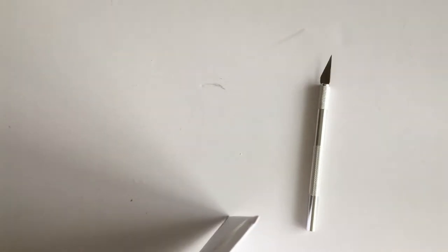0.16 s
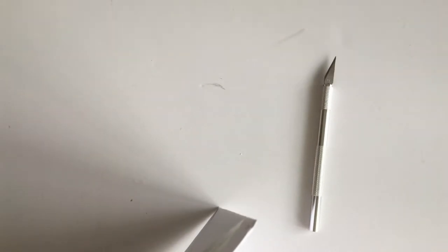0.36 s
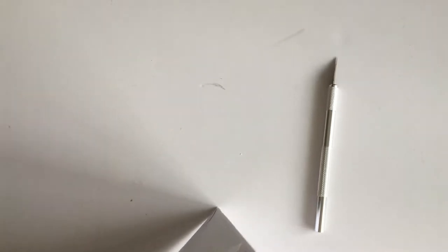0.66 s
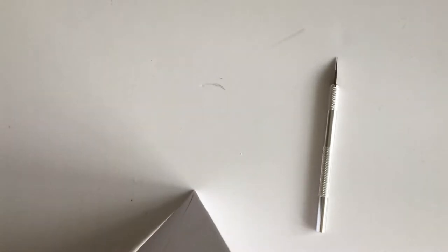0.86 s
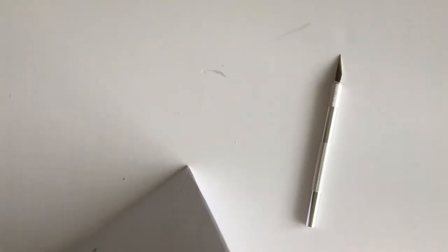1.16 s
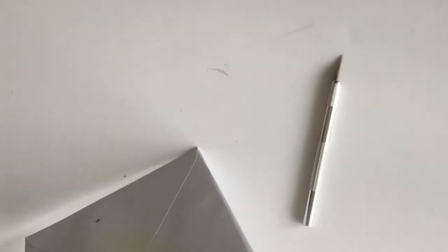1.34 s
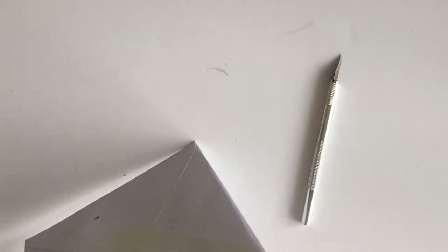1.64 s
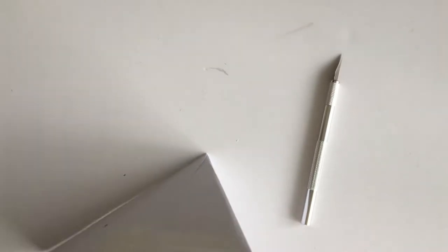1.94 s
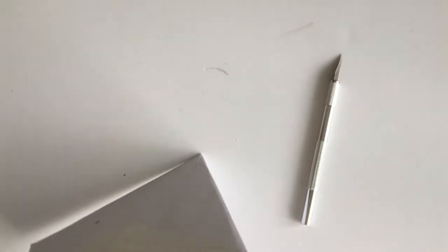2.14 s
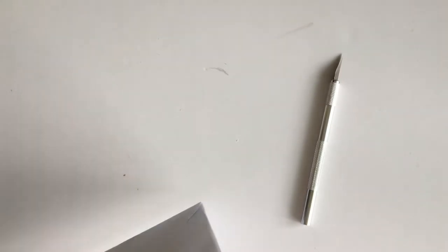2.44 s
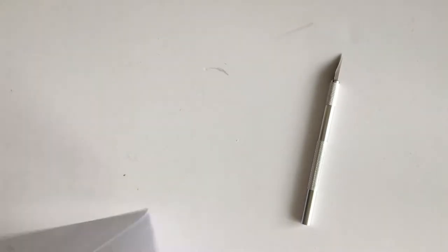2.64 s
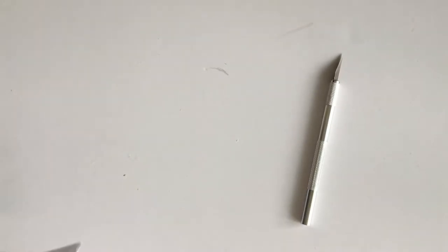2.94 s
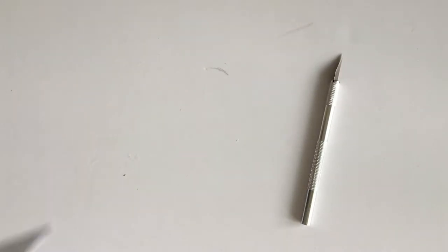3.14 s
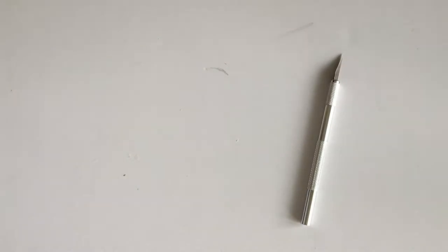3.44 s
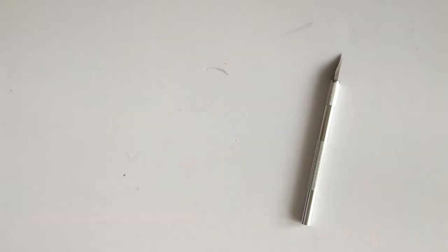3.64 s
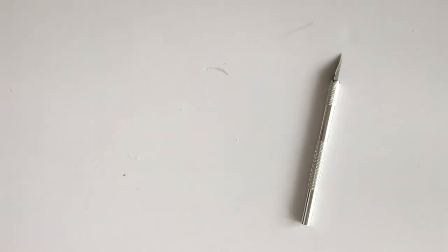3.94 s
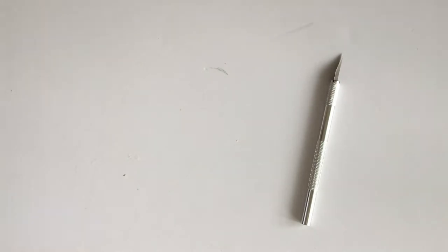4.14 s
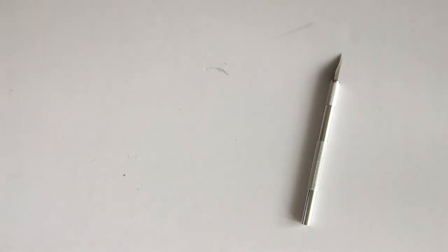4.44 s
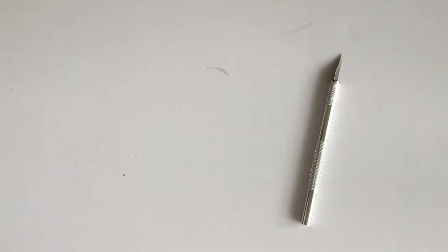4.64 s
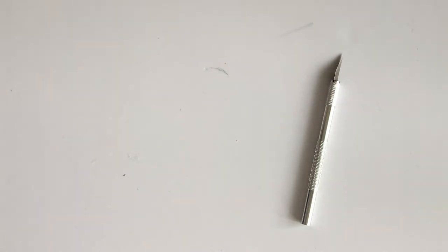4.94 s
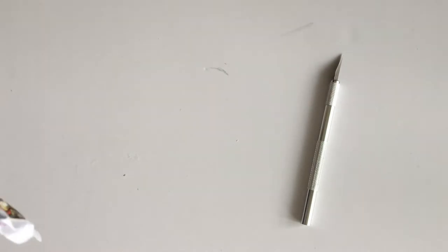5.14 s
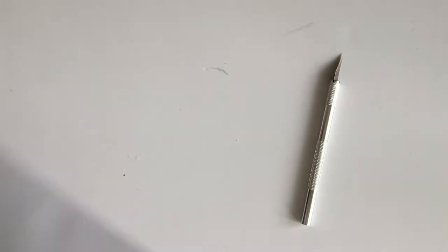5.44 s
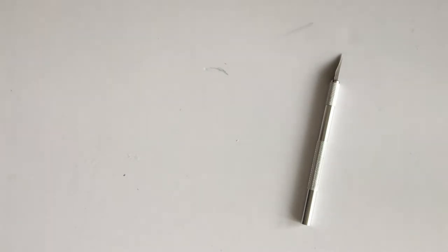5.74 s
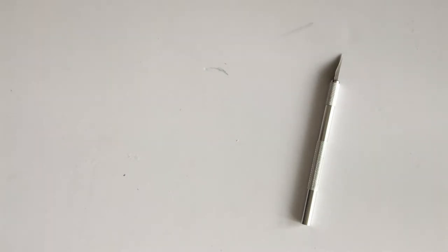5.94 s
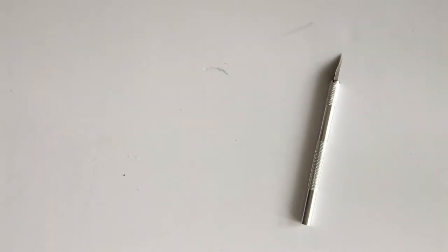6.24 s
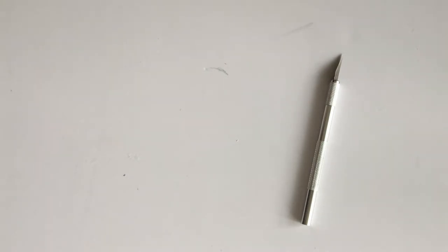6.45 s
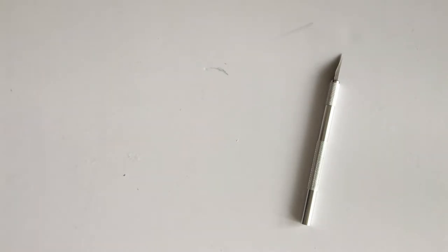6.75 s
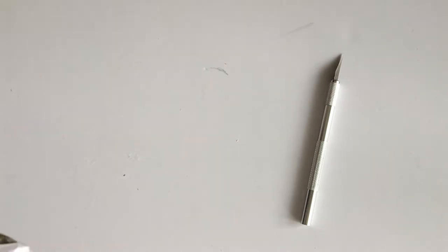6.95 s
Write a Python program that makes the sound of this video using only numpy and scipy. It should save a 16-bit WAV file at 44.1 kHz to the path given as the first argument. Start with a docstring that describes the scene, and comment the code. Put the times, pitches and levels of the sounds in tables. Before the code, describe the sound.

A small, quiet room heard through a close phone microphone, with a very faint floor. The first half second is nearly silent, save a tiny tick or two. From about 0.6 s paper is handled with light dry clicks and soft rubbing; near 0.95 s it bumps the desk, a short woody knock with a low thud and a puff of air. Creases pop until a sharp, loud rip at 1.7-1.85 s, jerky surges of snapping fibres. Brisk rustling and a few clicks lead to a second, quieter, brighter rip at 2.53-2.7 s, with soft low thumps of flexing paper. From 3 to 4.6 s come sparse, faint crinkles and sliding. Around 4.7 s and 5 s creases snap harder, and from 6 to 6.7 s the crackling, scraping and rubbing are densest, easing to small ticks by 7 s. Low fluttering air accompanies the movements.

```python
"""At a desk in a small quiet room, close to a phone's microphone, a paper envelope is handled with dry clicks.
It bumps the desk near 0.95 s, then tears open in two rips, near 1.7 s and 2.5 s: surges of snapping fibres.
Rummaging follows to the end: creases buckle, edges scrape and sheets slide over each other in filtered grains.
Throughout, the swaying paper fans low filtered noise at the microphone, over a faint room floor."""
import sys
import numpy as np
from scipy import signal
from scipy.fft import rfft, irfft
from scipy.io import wavfile
from scipy.ndimage import uniform_filter1d, map_coordinates

SR = 44100
rng = np.random.default_rng(int(sys.argv[2]) if len(sys.argv) > 2 else 0)


def transcribe(signal):
    """Save signal, clipped to [-1, 1], as a 16-bit WAV file at the path in sys.argv[1]."""
    frames = np.atleast_2d(signal).T
    limited = np.clip(frames, -1, 1)
    pcm = np.round(limited * 32767).astype(np.int16)
    wavfile.write(sys.argv[1], SR, pcm)


N = 312669
TIME = np.arange(N) / SR

# Table levels are relative: most layers add a trim of their own. Spectra give shape only.
# spectrum of the quiet room: (frequency [Hz], level per Hz [dB])
ROOM_SPECTRUM = [(25, -21), (48, -14.5), (68, -8), (110, -14), (300, -16.5), (500, -23.5), (1000, -29),
                 (2300, -33.5), (3500, -35.5), (9500, -40), (15500, -53)]
# spectrum of air fanned by the paper: (frequency [Hz], level per Hz [dB])
SWAY_SPECTRUM = [(22, -21.5), (42, -5), (65, 4), (100, -0.5), (130, -5), (220, -11.5), (400, -23),
                 (900, -36), (3000, -49)]
# wafts of air from the swaying envelope: (peak time [s], decay [s], level [dB])
WAFTS = [(0.958, 0.03, -41), (1.09, 0.18, -48.5), (2.44, 0.17, -48.5), (3.21, 0.07, -57),
         (3.6, 0.03, -54.5), (4.425, 0.017, -53), (4.73, 0.025, -44), (5.0, 0.17, -52), (5.224, 0.02, -49),
         (5.35, 0.1, -53.5), (5.79, 0.011, -46), (6.3, 0.018, -54), (6.43, 0.05, -57.5),
         (6.62, 0.02, -48.5), (6.888, 0.043, -45)]
WAFT_RISE_S = 0.027
# bumps on the desk: (time [s], knock level [dB], thud level [dB])
DESK_BUMPS = [(0.9377, -19, -34), (0.946, -31, -16.5), (0.9605, -47, -27)]
# modes of the desk in the knock: (frequency [Hz], level [dB], t60 [s])
KNOCK_MODES = [(340, -13, 0.011), (423, 1.5, 0.015), (650, -18, 0.013), (1320, -22, 0.0087)]
# modes of the desk in the thud: (frequency [Hz], level [dB], t60 [s])
THUD_MODES = [(62, -6, 0.055), (125, -16, 0.084), (187, -17, 0.075)]
# fingers pressing and flexing the envelope: (time [s], level [dB], starting pitch [Hz])
PRESSES = [(0.702, -45.5, 118), (0.777, -47, 111), (2.019, -57, 133), (2.089, -40, 103), (2.51, -60, 90),
           (2.545, -36, 110), (2.684, -31, 125), (4.713, -41.5, 80.6), (5.068, -48.5, 109),
           (5.79, -47, 139.3), (6.431, -60.5, 122), (6.90, -68.5, 75)]
# creases buckling: (time [s], ring level [dB], ring pitch [Hz], treble tick level [dB], low puff level [dB])
CREASES = [(0.408, -57, 3200, -67, -61), (0.739, -77, 3390, -48, -63), (0.842, -47.5, 2240, -43, -56),
           (0.853, -66, 2970, -35, -81), (0.888, -48.5, 1370, -64, -58), (1.0833, -40.5, 2180, -65, -42.5),
           (1.2437, -35.5, 1900, -73, -57), (1.3175, -44, 1450, -53, -61), (1.348, -47.5, 1580, -53, -62),
           (1.424, -56.5, 1280, -71, -65), (1.5161, -60, 2400, -50.5, -54), (1.6074, -54.5, 2220, -45, -63),
           (1.616, -70, 2070, -44.5, -53), (2.0417, -42.5, 1300, -48, -74), (2.2058, -34, 1480, -46, -65),
           (2.4043, -39.5, 1280, -51, -46), (2.451, -42.5, 1370, -63, -46.5), (2.7954, -71, 2440, -44, -74),
           (3.073, -58.5, 650, -55.5, -44), (3.0824, -49, 1450, -45.5, -53), (3.0918, -57, 910, -52, -56.5),
           (3.181, -51, 2020, -55, -49), (3.1878, -42.5, 1860, -50.5, -41), (3.2443, -45.5, 1540, -62, -51),
           (3.2621, -55, 3300, -43, -65), (3.2853, -45.5, 2840, -49, -57), (3.567, -46.5, 1238, -72, -52),
           (3.5855, -43.5, 2280, -40, -50), (3.788, -66.5, 2180, -64.5, -68.5),
           (3.8572, -66, 2200, -67, -67), (3.9427, -60, 2260, -59.5, -64), (3.983, -66, 2100, -61, -64),
           (4.0411, -46, 2960, -50, -49.5), (4.046, -59, 1690, -49, -45), (4.1434, -48.5, 1940, -54, -59.5),
           (4.3355, -53, 583, -65, -44), (4.4489, -46, 1360, -70, -55), (4.602, -49, 1980, -57, -48),
           (4.62, -50, 1310, -66, -54), (4.7096, -43, 1860, -38, -35), (4.714, -33.5, 2000, -44, -47),
           (4.9075, -52, 480, -62, -44.5), (5.0078, -30.5, 1660, -42, -45.5), (5.071, -60, 2510, -52, -56),
           (5.1811, -37, 1400, -71, -56), (5.3534, -34, 1710, -48.5, -41), (5.368, -60, 2300, -39.5, -70),
           (5.3909, -37.5, 1630, -69, -51), (5.4387, -48, 2030, -47.5, -51.5),
           (5.526, -40, 1187, -69.5, -50), (5.5354, -44, 1140, -66, -54.5), (5.807, -45.5, 1080, -66, -52),
           (5.887, -52, 2110, -50.5, -53), (5.9422, -51.5, 2290, -47.5, -71),
           (5.9756, -47, 1320, -57, -49.5), (6.0288, -45.5, 2260, -40.5, -54),
           (6.047, -64, 2200, -61, -47.5), (6.1197, -36, 1950, -38, -52), (6.1736, -37, 1330, -35, -59),
           (6.2394, -29.5, 2050, -43, -41), (6.3855, -39.5, 2350, -63, -60), (6.4, -42.5, 2130, -48, -71),
           (6.4327, -28, 1480, -59, -42.5), (6.5408, -43, 1800, -50, -59), (6.5726, -37, 1650, -34, -46),
           (6.5958, -41, 2750, -34, -47), (6.5998, -38.5, 2090, -45, -54),
           (6.6952, -53.5, 2600, -47, -55.5), (6.878, -43.5, 2380, -48, -69),
           (6.899, -53, 1790, -69, -47.5), (6.9663, -53, 1010, -53.5, -48.5)]
# resonances of the envelope's panels, widened by band() to an octave or more:
# (centre [Hz], nominal width [Hz], level [dB])
PANEL_RESONANCES = [(383, 110, -6), (613, 90, -2), (840, 67, -6.5), (1300, 71, -20.5), (2350, 2700, -13),
                    (4500, 680, -16.5)]
# short brisk scrapes of an edge: (time [s], length [s], level [dB], centre [Hz])
SCRAPES = [(0.002, 0.02, -60, 1850), (0.316, 0.027, -64, 7400), (0.408, 0.016, -62.5, 3400),
           (0.706, 0.04, -53, 7200), (0.771, 0.019, -56, 7050), (1.448, 0.022, -50.5, 5020),
           (1.587, 0.004, -47, 5900), (2.907, 0.039, -58.5, 5240), (3.079, 0.023, -48.5, 6500),
           (3.26, 0.027, -47, 6500), (4.375, 0.021, -51, 2500), (4.394, 0.03, -48, 5950),
           (5.79, 0.012, -54, 2200), (6.006, 0.037, -52, 4570), (6.096, 0.04, -43.5, 2980),
           (6.251, 0.055, -42, 3900), (6.382, 0.045, -48, 3700), (6.552, 0.028, -51, 3000)]
# strokes of paper over paper:
# (start time [s], length [s], hiss level [dB], sheet body level [dB], swell from start to end [dB])
STROKES = [(0.6, 0.1, -75, -76, 5), (0.796, 0.36, -62, -55.5, -3), (1.052, 0.25, -56, -52.5, -12),
           (1.307, 0.14, -59, -57.5, -11), (1.425, 0.1, -56, -58.5, -4), (1.576, 0.037, -60, -58, -1.5),
           (1.65, 0.08, -59.5, -63, 10), (1.863, 0.11, -57, -55, -9), (1.97, 0.11, -52.5, -44, 6),
           (2.128, 0.16, -54.5, -57, -4), (2.322, 0.086, -54, -52.5, 5.5), (2.454, 0.077, -66, -59, 1),
           (2.716, 0.13, -60.5, -67, 2), (2.902, 0.051, -61, -60, -1), (3.013, 0.069, -66.5, -62, 8.5),
           (3.172, 0.14, -60.5, -58.5, 0), (3.376, 0.12, -62.5, -63.5, -3), (3.687, 0.097, -70, -66.5, -8),
           (4.03, 0.23, -58.5, -62, 1.5), (4.311, 0.22, -53.5, -53, 1), (4.569, 0.18, -62, -56, 10),
           (4.79, 0.095, -72, -74, 0), (4.909, 0.19, -53.5, -54, -4), (5.14, 0.078, -58.5, -59, -6),
           (5.317, 0.11, -54.5, -48.5, -3), (5.732, 0.093, -57.5, -61, -5.5),
           (5.83, 0.31, -60.5, -56.5, 14), (6.246, 0.065, -46, -50.5, 1), (6.328, 0.096, -53.5, -43, 11),
           (6.527, 0.084, -50.5, -46, 9), (6.643, 0.41, -61.5, -61, -1.5)]
STROKE_ATTACK_S, STROKE_RELEASE_S = 0.024, 0.018
# spectrum of the rubbing hiss: (frequency [Hz], level per Hz [dB])
HISS_SPECTRUM = [(1000, -20.5), (2500, -16), (3800, 1), (4900, -8), (6200, -1), (8000, -11), (9400, -4),
                 (10700, -17.5), (13000, -9), (16000, -20.5)]
# spectrum of the rubbing carried by the sheet: (frequency [Hz], level per Hz [dB])
BODY_SPECTRUM = [(150, -7), (400, -1.5), (650, 1), (900, -1.5), (1300, 0), (1700, -3), (2300, 3.5),
                 (3200, -9.5), (7000, -25)]
# the sheets rub as a crease is loaded and as it settles; levels are against its tick and its ring
SETTLE_HISS_DB, SETTLE_BODY_DB, LOAD_S, SETTLE_S = -12, -13.5, 0.0081, 0.02
# the faint rub of simply holding the envelope
HOLD_FROM_S, HOLD_RISE_S, HOLD_HISS_DB, HOLD_BODY_DB = 0.54, 0.12, -77, -72
# surges of the running tear: (time [s], length [s], level [dB], treble minus mids [dB])
SURGES = [(1.721, 0.00079, -22, 10), (1.726, 0.006, -25.5, 6.5), (1.741, 0.0066, -24, 7),
          (1.7515, 0.0053, -23, 5), (1.76, 0.0026, -18.5, -7), (1.766, 0.0062, -17, -10),
          (1.776, 0.0041, -18, -9), (1.7851, 0.0014, -5.5, -2.5), (1.8021, 0.0034, -5.5, -4.5),
          (1.805, 0.011, -13.5, -11), (1.8291, 0.0075, -8.5, -5.5), (1.842, 0.0037, -22, -1),
          (2.5326, 0.0035, -17.5, 6), (2.5432, 0.0045, -21, 9), (2.552, 0.0044, -25, -24),
          (2.5734, 0.0056, -23, 0), (2.585, 0.0027, -33, -6), (2.5956, 0.0068, -26.5, -11),
          (2.605, 0.009, -24.5, 3), (2.6173, 0.0028, -21, 0.5), (2.622, 0.0056, -23.5, -1),
          (2.63, 0.0056, -18.5, -10), (2.636, 0.013, -30, 3), (2.6772, 0.0018, -19.5, 7),
          (2.682, 0.0064, -20.5, 2.5), (2.694, 0.0036, -40, 5), (2.6994, 0.0016, -18, -3.5)]
# steady pull between the surges, one table a rip: (time [s], level [dB])
PULLS = [
    [(1.72, -73), (1.733, -31), (1.77, -43), (1.80, -25.5), (1.825, -27.5), (1.85, -28.5), (1.88, -39)],
    [(2.53, -32.5), (2.565, -46), (2.60, -43), (2.635, -26.5), (2.66, -37), (2.695, -29), (2.72, -66),
     (2.76, -64)],
]
# spectrum of the torn sheet, one table a rip: (frequency [Hz], level per Hz [dB])
TEAR_SPECTRA = [
    [(25, -34.5), (45, -9), (170, -7), (270, -18), (380, -13.5), (550, -12), (850, -6.5), (1250, 2),
     (1850, -10), (2350, -4), (3150, -12), (3800, -7), (6100, -8.5), (16000, -24)],
    [(25, -27), (42, -8), (70, 1), (250, -8.5), (400, -2.5), (520, -5.5), (900, -3), (1300, -4.5),
     (1900, -1.5), (2400, -3.5), (3200, -5), (6600, -3.5), (10500, -7.5), (16000, -15)],
]


def undb(db):
    """Decibels to gain."""
    return 10 ** (np.asarray(db) / 20)


def unit(x):
    """Scale to rms 1."""
    return x / np.sqrt(np.mean(x ** 2) + 1e-20)


def curve(rows):
    """Gain over time from (time [s], level [dB]) points; silent outside them."""
    s, db = np.transpose(rows)
    return undb(np.interp(TIME, s, db, left=-200, right=-200))


def add(out, s, sound):
    """Mix a sound in at a time."""
    start = max(int(s * SR), 0)
    out[start:start + len(sound)] += sound[:max(len(out) - start, 0)]


def band(x, lo_hz, hi_hz, order=2):
    """Causal band-pass, always at least an octave wide."""
    lo_hz = min(lo_hz, hi_hz / 2)
    return signal.lfilter(*signal.butter(order, [lo_hz, hi_hz], "band", fs=SR), x)


def pulse(points, size=4096):
    """Causal impulse response with the given spectrum, so clicks keep their sharp fronts."""
    hz, db = np.transpose(points)
    bins_hz = np.arange(size // 2 + 1) * SR / size
    log_gain = np.log(undb(np.interp(np.log(bins_hz + 1), np.log(hz), db)))
    # folding the cepstrum onto positive times makes the response minimum-phase
    cepstrum = irfft(log_gain)
    cepstrum[1:size // 2] *= 2
    cepstrum[size // 2 + 1:] = 0
    return irfft(np.exp(rfft(cepstrum)))


def through(x, response):
    """Filter with a response scaled to unit energy."""
    return signal.fftconvolve(x, response / np.linalg.norm(response))[:len(x)]


def colour(x, points):
    """Give a sound a spectrum."""
    return through(x, pulse(points))


def walk(rate):
    """Smooth random wander with a spread near 1, through `rate` random points per second."""
    return np.interp(TIME * rate, np.arange(8192), rng.standard_normal(8192))


def snaps(rate, spread_db):
    """Random tiny clicks of uneven size, about `rate` per second, rms 1."""
    size = undb(spread_db * np.minimum(rng.exponential(size=N), 4))
    sign = rng.choice([-1, 1], N)
    return unit((rng.random(N) < rate / SR) * size * sign)


def gesture(s, length, attack_s, release_s, swell_db=0):
    """Gain of one movement: it rises, holds while swelling or fading, and dies away."""
    t = TIME - s
    held = undb(swell_db * (np.clip(t / max(length, attack_s), 0, 1) - .5))
    return np.clip(t / attack_s, 0, 1) * held * np.exp(-np.maximum(t - length, 0) / release_s)


def sway(body_force, rest_db=-70, follow_db=-11):
    """Strength of the moving air: a little always, more as the sheet is worked, most in the wafts."""
    power = undb(rest_db) ** 2 + (undb(follow_db) * body_force) ** 2
    for peak_s, decay_s, db in WAFTS:
        waft = gesture(peak_s - WAFT_RISE_S, WAFT_RISE_S, WAFT_RISE_S, decay_s)
        power += (undb(db) * waft) ** 2
    return np.sqrt(power)


def air(body_force, sway_db=-1, floor_db=-67):
    """Low flutter from the waving paper, over the quiet of the room."""
    gusts = rng.standard_normal(N) * sway(body_force) * undb(0.73 * walk(38))
    flutter = colour(gusts, SWAY_SPECTRUM)
    floor = colour(rng.standard_normal(N), ROOM_SPECTRUM)
    return undb(sway_db) * flutter + undb(floor_db) * floor


def room(x, t60_low=0.19, t60_high=0.077, wet_db=-9, wet_high_db=-12):
    """The short ring of the desk and walls: decaying noise in two bands, the treble dying sooner."""
    t = TIME[:SR // 2]
    noise = rng.standard_normal(len(t)) * np.clip((t - .001) / .002, 0, 1)  # starts after 1 ms
    response = 1. * (t == 0)  # the direct sound
    for lo_hz, hi_hz, t60, db in [(90, 6100, t60_low, wet_db), (6500, 18000, t60_high, wet_high_db)]:
        tail = noise * np.exp(-np.log(1000) * t / t60)
        response = response + undb(db) * band(tail / np.linalg.norm(tail), lo_hz, hi_hz, order=1)
    return signal.fftconvolve(x, response)[:N]


def ringing(modes, t):
    """A struck desk top as a sum of decaying sine modes."""
    return sum(undb(db) * np.sin(2 * np.pi * hz * t) * np.exp(-np.log(1000) * t / t60)
               for hz, db, t60 in modes)


def desk():
    """The envelope knocks on the desk top, which thuds as the weight settles."""
    out, t = np.zeros(N), TIME[:SR // 4]
    knock, thud = ringing(KNOCK_MODES, t), ringing(THUD_MODES, t)
    for s, knock_db, thud_db in DESK_BUMPS:
        add(out, s, undb(knock_db) * knock + undb(thud_db) * thud)
    return out


def presses(swell_s=0.0026, sag=0.37, press_db=3):
    """The broad face of the envelope flexes with a soft thump that sinks in pitch."""
    out, t = np.zeros(N), TIME[:SR // 12]
    swell = t / swell_s * np.exp(1 - t / swell_s)  # peaks at 1 after swell_s
    for s, db, hz in PRESSES:
        phase = 2 * np.pi * hz * t * (1 - sag * t / t[-1])
        add(out, s, undb(db + press_db) * np.sin(phase) * swell)
    return out


def panels(x, direct_db=-3, panel_db=-1):
    """Every click also rings the flat faces of the envelope."""
    ring = sum(undb(db) * band(x, hz - width / 2, hz + width / 2, order=1)
               for hz, width, db in PANEL_RESONANCES)
    return undb(direct_db) * x + undb(panel_db) * ring


def creases(tick_s=0.0049, puff_s=0.0092, below=1.855, above=1.654, tick_db=-2, puff_db=-5.5):
    """A crease flips: a pulse and scattered reflections ring a panel, tick at the fold and puff air."""
    out, t = np.zeros(N), TIME[:SR // 20]
    chance = rng.standard_normal((len(CREASES), 3, len(t)))
    cycles, scatter = 4.5, .4  # decay of the reflections in ring cycles, and their size
    # scale so that levels are rms over 8 ms of a click and 25 ms of a puff
    click_gain, puff_gain = np.sqrt(.008 / t[-1]), np.sqrt(.025 / t[-1])
    flip = (t == 0) * 2.
    for (s, ring_db, hz, high_db, low_db), (ring_noise, tick_noise, puff_noise) in zip(CREASES, chance):
        # larger, lower panels rattle on for longer
        reflections = scatter * ring_noise * np.exp(-t * hz / cycles)
        ring = band(flip + reflections, hz / below, hz * above)
        fold = flip + scatter * tick_noise * np.exp(-t / tick_s)
        tick = band(band(fold, 3500, 11200, order=1), 2500, 14000)
        puff = band(puff_noise * np.exp(-t / puff_s), 43.6, 230)
        click = undb(ring_db) * unit(ring) + undb(high_db + tick_db) * unit(tick)
        add(out, s, click_gain * click)
        add(out, s, puff_gain * undb(low_db + puff_db) * unit(puff))
    return out


def scrapes(width=2.02, edge_s=0.009, scrape_db=-1):
    """An edge skids briefly over the sheet in a dense run of slips."""
    out, slips = np.zeros(N), snaps(4000, 1.8)
    click = 1. * (TIME[:SR // 100] == 0)
    for s, length, db, hz in SCRAPES:
        gate = np.clip(np.minimum(TIME - s, s + length - TIME) / edge_s + .5, 0, 1)
        out += undb(db + scrape_db) * through(slips * gate, band(click, hz / width, hz * width))
    return out


def crinkles(rubbing, count=1800, size_db=2):
    """Small wrinkles tick while the paper moves, each with its own pitch; size follows the rubbing."""
    out, t = np.zeros(N), TIME[:SR // 120]
    low_hz, high_hz, cycles, spread_db = 1200, 8000, 1.2, 13
    for when, pitch, size in rng.random((count, 3)):
        hz = low_hz * (high_hz / low_hz) ** pitch
        pop = np.sin(2 * np.pi * hz * t) * np.exp(-hz * t / cycles) * np.sqrt(hz / low_hz)
        level = rubbing[int(when * N)] * undb(size_db + spread_db * size ** 3)  # few large ones
        add(out, when * N / SR, pop * level)
    return out


def rubbing_force():
    """Strength of the hiss and of the sheet body: holding, strokes and flexing creases add in power."""
    held = np.clip((TIME - HOLD_FROM_S) / HOLD_RISE_S, 0, 1)
    hiss, body = (held * undb(HOLD_HISS_DB)) ** 2, (held * undb(HOLD_BODY_DB)) ** 2
    for s, length, hiss_db, body_db, swell_db in STROKES:
        stroke = gesture(s, length, STROKE_ATTACK_S, STROKE_RELEASE_S, swell_db)
        hiss += (undb(hiss_db) * stroke) ** 2
        body += (undb(body_db) * stroke) ** 2
    for s, ring_db, _, tick_db, _ in CREASES:
        near = np.abs(TIME - s) < .15
        t = TIME[near] - s
        flex = np.exp(np.minimum(t / LOAD_S, -t / SETTLE_S))
        hiss[near] += (undb(tick_db + SETTLE_HISS_DB) * flex) ** 2
        body[near] += (undb(ring_db + SETTLE_BODY_DB) * flex) ** 2
    return np.sqrt(hiss), np.sqrt(body)


def sliding(hiss_force, body_force, hiss_rate=10000, body_rate=2500, spread_db=3, judder_db=2,
            hiss_db=-1, body_db=-3.0):
    """Paper fibres catch and slip on each other; the grip judders and the sheet carries the lower part."""
    grip = undb(judder_db * walk(90))
    hiss_grains = snaps(hiss_rate, spread_db) * grip * hiss_force
    body_grains = snaps(body_rate, spread_db) * grip * undb(1.5 * walk(45)) * body_force
    hiss = colour(hiss_grains, HISS_SPECTRUM)
    body = colour(body_grains, BODY_SPECTRUM)
    return undb(hiss_db) * hiss + undb(body_db) * body


def shifting(x, rate, gap_s=0.000648):
    """The facing sheet reflects the sound across a gap that keeps changing, so the colour sweeps."""
    share, swing = .45, .4  # echo gain, and wander of the gap on a log scale
    lag = gap_s * np.exp(swing * walk(rate))
    echo = map_coordinates(x, [(TIME - lag) * SR], order=3)
    return (x + share * band(echo, 460, 8100, order=1)) / np.hypot(1, share)


def rips(fibre_rate=6000, spread_db=1.0, release_s=0.00031, surge_db=-1.84, pull_db=-2, split_hz=4500):
    """Fibres snap in crowds as the tear jumps ahead; the sheet radiates them, brighter when held taut."""
    out, t = np.zeros(N), TIME[:SR // 20]
    fibres = snaps(fibre_rate, spread_db)
    # each jump releases a set amount of strain, however it is shared among the fibres
    crowd_power = np.abs(uniform_filter1d(fibres ** 2, SR // 400))
    fibres = fibres / np.sqrt(crowd_power + .03)
    creep = snaps(5000, 3.1) * undb(pull_db)
    for pull, spectrum in zip(PULLS, TEAR_SPECTRA):
        mids_force, treble_force = np.zeros(N), np.zeros(N)
        for s, length, db, treble_db in SURGES:
            if pull[0][0] - .1 < s < pull[-1][0]:  # only the surges of this rip
                release = np.exp(-np.maximum(t - length, 0) / release_s)
                # mids and treble share the power of the surge
                surge = undb(db + surge_db) * release / np.hypot(1, undb(treble_db))
                add(mids_force, s, surge)
                add(treble_force, s, surge * undb(treble_db))
        sheet = pulse(spectrum)
        out += through(fibres * mids_force, band(sheet, 25, split_hz, order=3))
        out += through(fibres * treble_force, band(sheet, split_hz, .47 * SR, order=3))
        out += through(creep * curve(pull), sheet)
    return out


def scene():
    """All the paper sounds in the room, with the moving air straight at the microphone."""
    tearing = shifting(rips(), rate=110, gap_s=.0007)
    hiss_force, body_force = rubbing_force()
    ticking = crinkles(np.sqrt(hiss_force * body_force))
    rubbing = shifting(sliding(hiss_force, body_force) + scrapes() + ticking, rate=18)
    handling = panels(creases()) + presses() + desk()
    return (room(tearing + rubbing + handling) + air(body_force))[None]


def record(dry, rumble_hz=33, top_hz=16200):
    """The phone drops the deepest rumble, rounds the highest peaks and cuts the top."""
    sound = signal.sosfilt(signal.butter(4, rumble_hz, "high", fs=SR, output="sos"), dry)
    rounded = np.tanh(sound)
    return signal.sosfilt(signal.ellip(8, .2, 70, top_hz, fs=SR, output="sos"), rounded)


dry = scene()
out = record(dry)
transcribe(out)
```